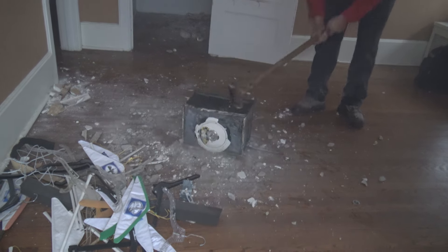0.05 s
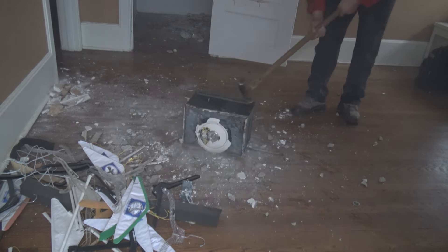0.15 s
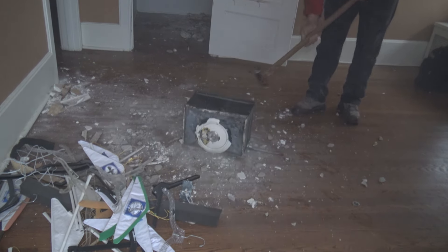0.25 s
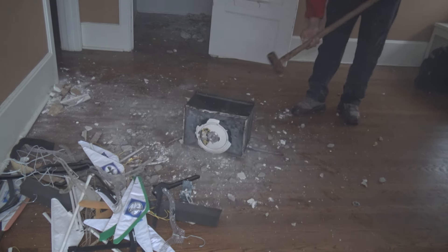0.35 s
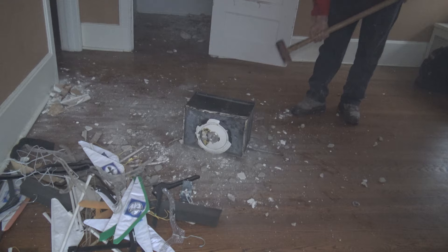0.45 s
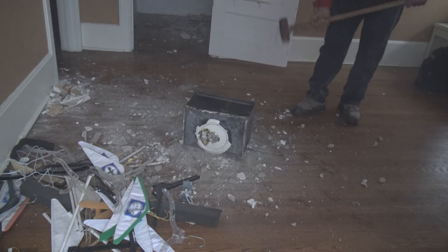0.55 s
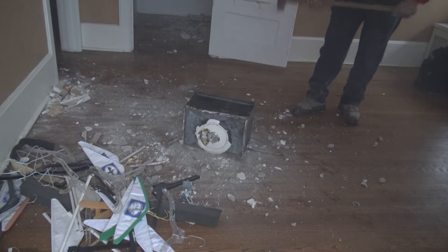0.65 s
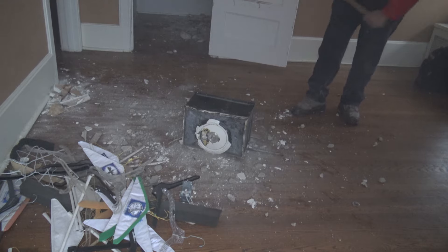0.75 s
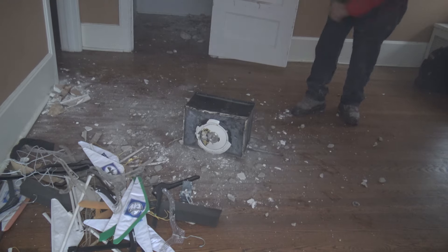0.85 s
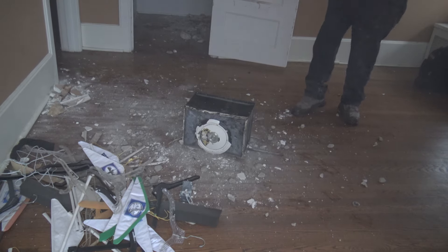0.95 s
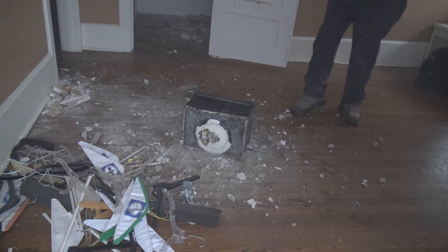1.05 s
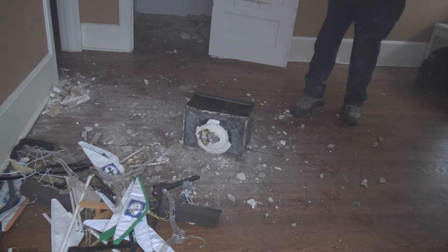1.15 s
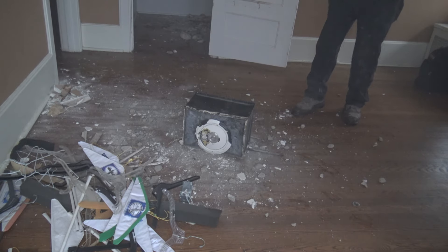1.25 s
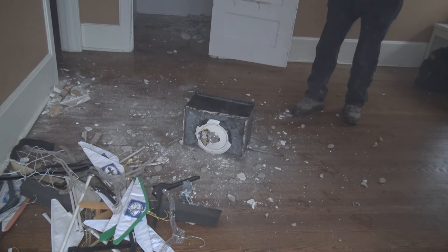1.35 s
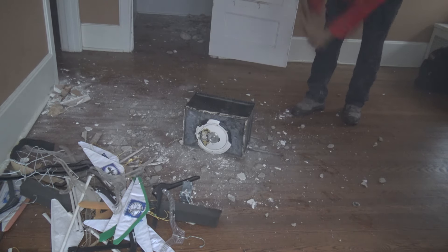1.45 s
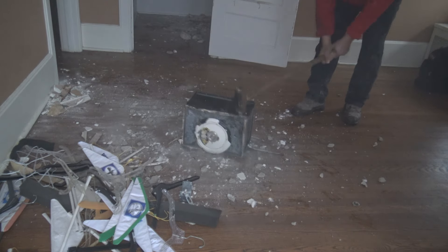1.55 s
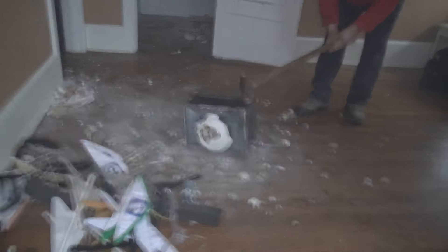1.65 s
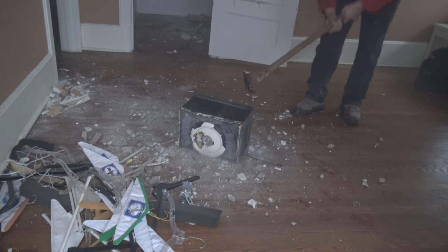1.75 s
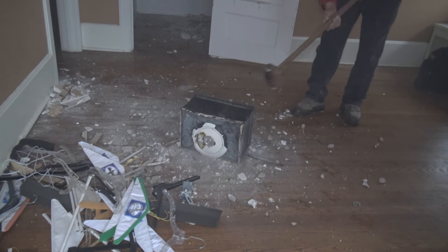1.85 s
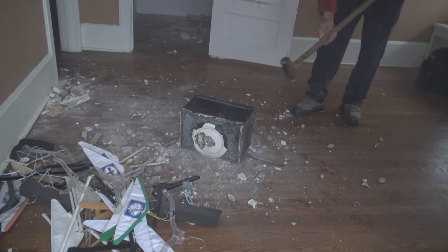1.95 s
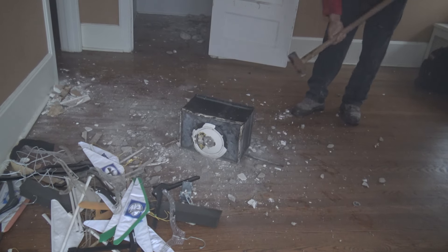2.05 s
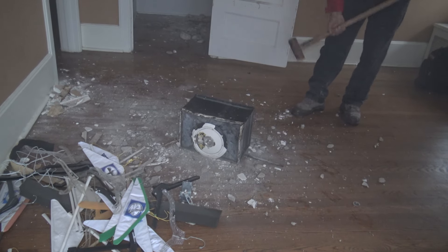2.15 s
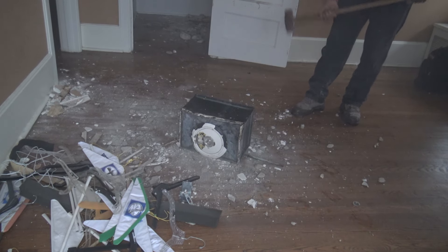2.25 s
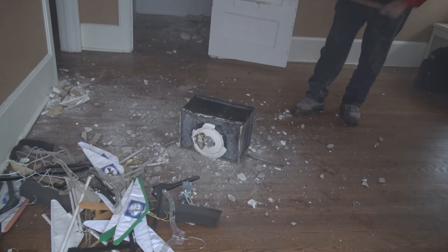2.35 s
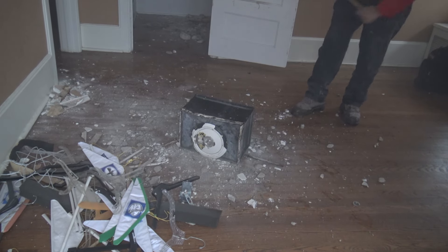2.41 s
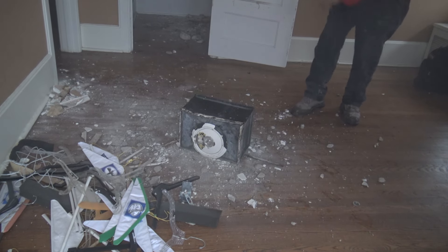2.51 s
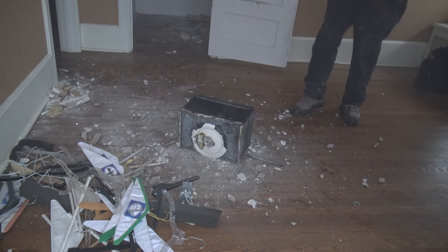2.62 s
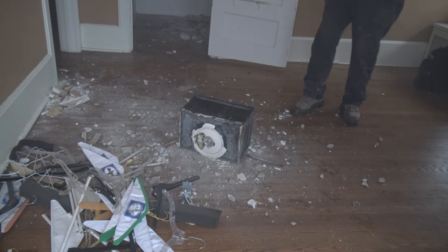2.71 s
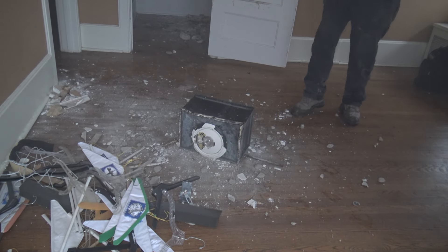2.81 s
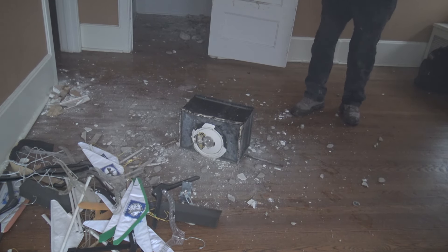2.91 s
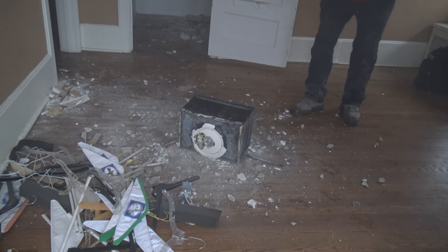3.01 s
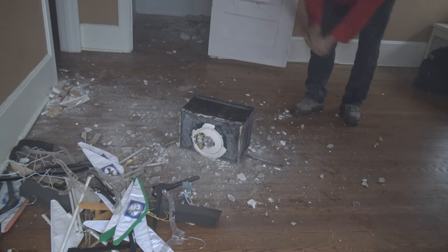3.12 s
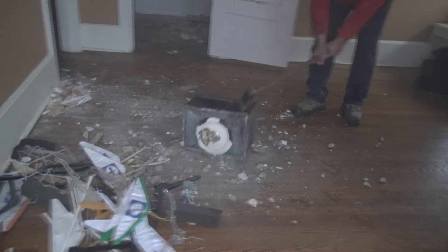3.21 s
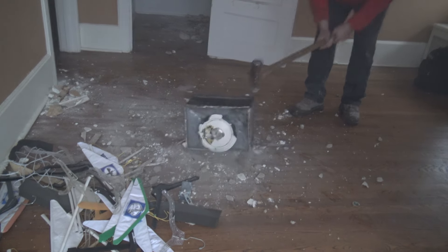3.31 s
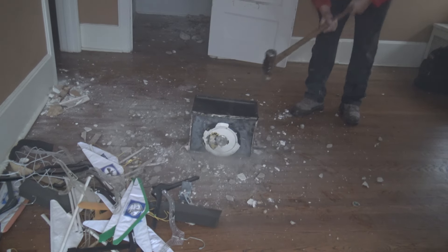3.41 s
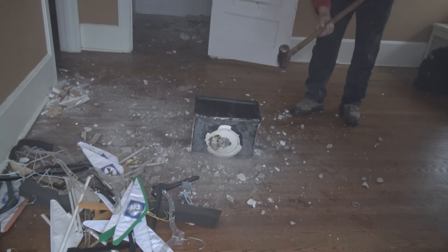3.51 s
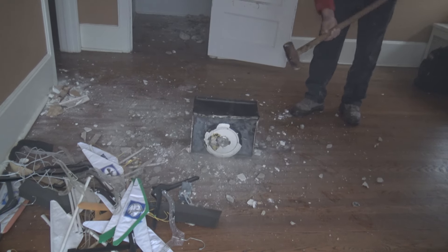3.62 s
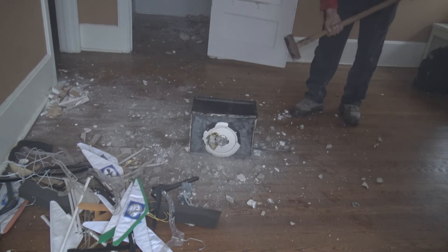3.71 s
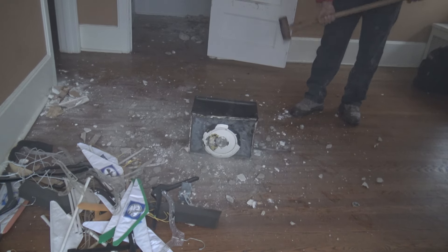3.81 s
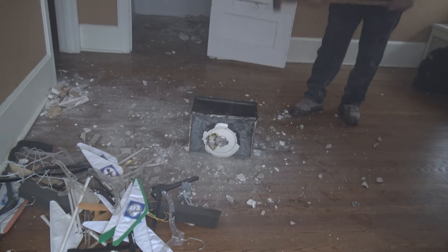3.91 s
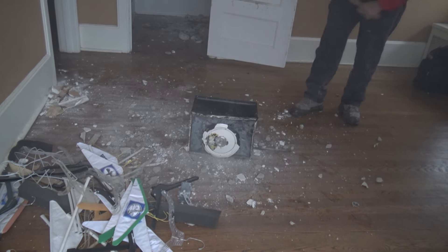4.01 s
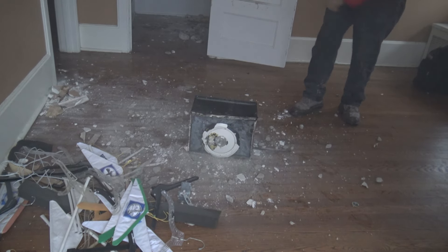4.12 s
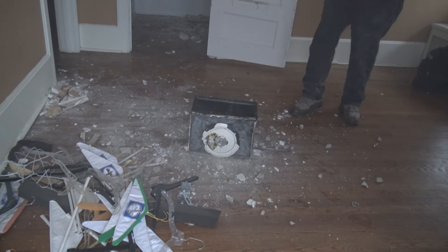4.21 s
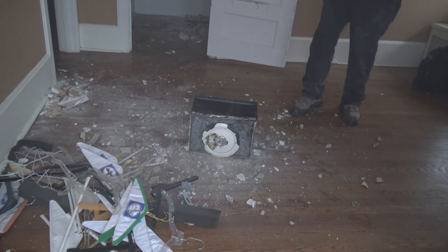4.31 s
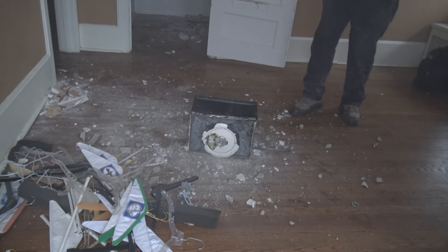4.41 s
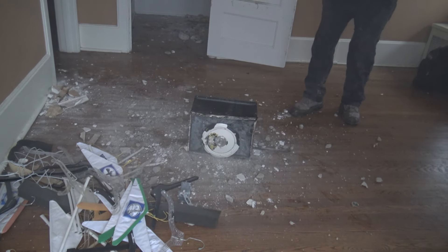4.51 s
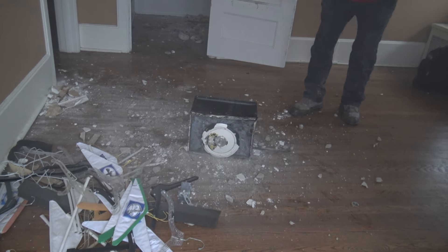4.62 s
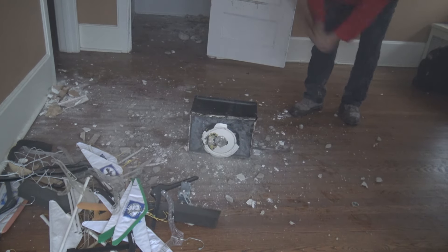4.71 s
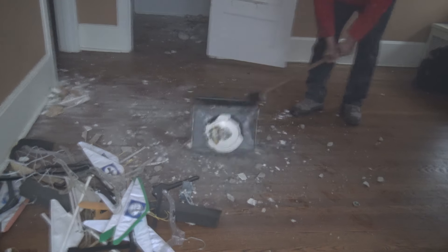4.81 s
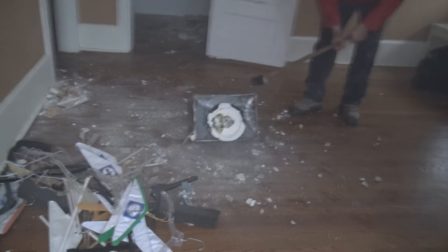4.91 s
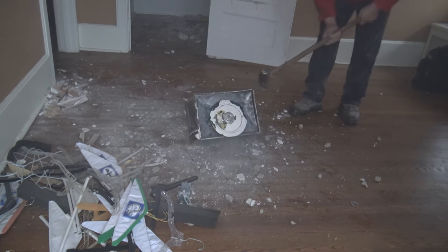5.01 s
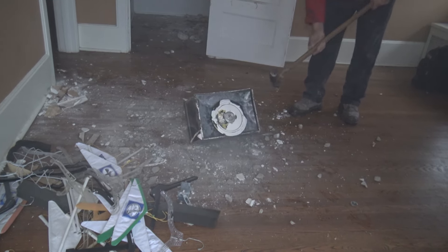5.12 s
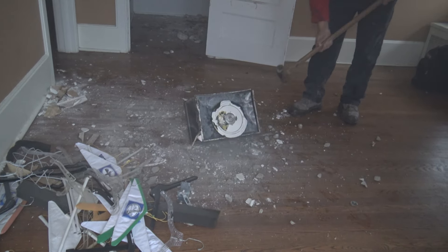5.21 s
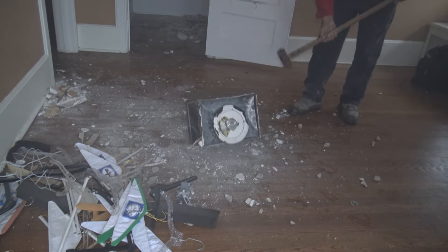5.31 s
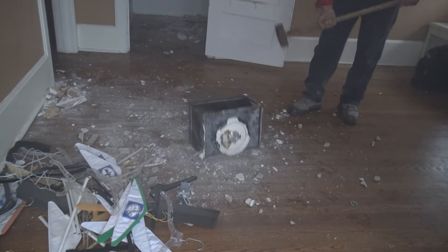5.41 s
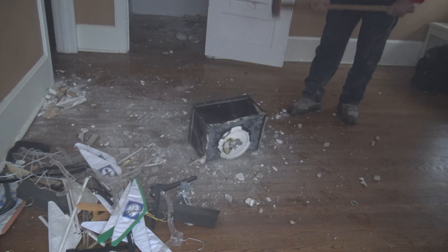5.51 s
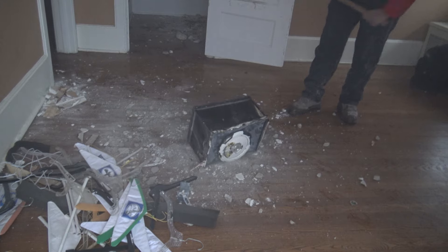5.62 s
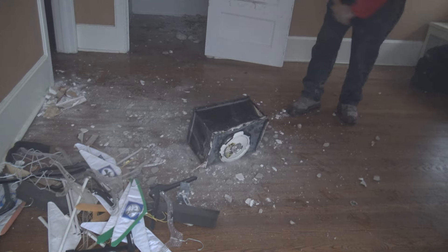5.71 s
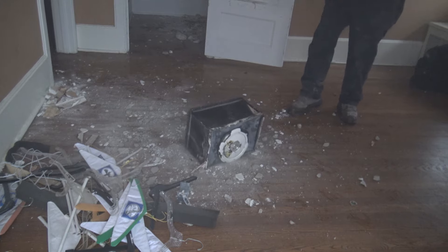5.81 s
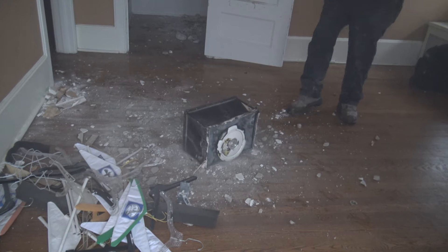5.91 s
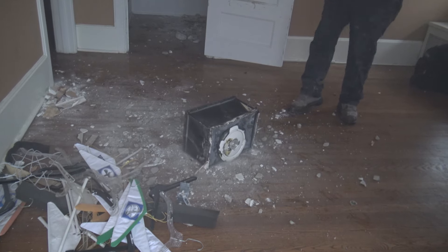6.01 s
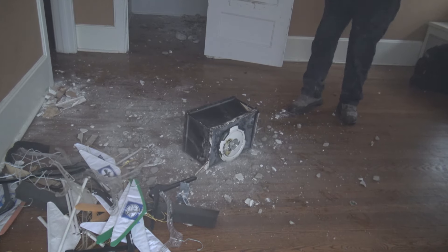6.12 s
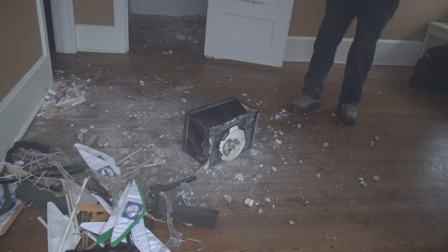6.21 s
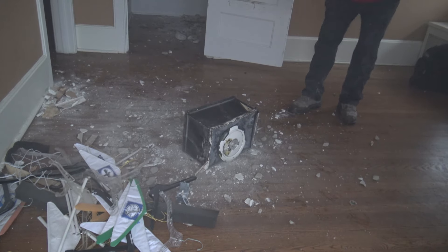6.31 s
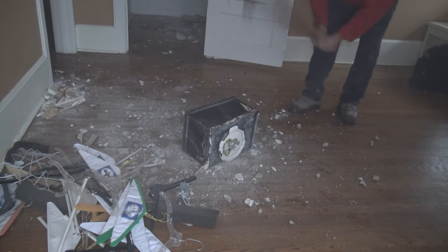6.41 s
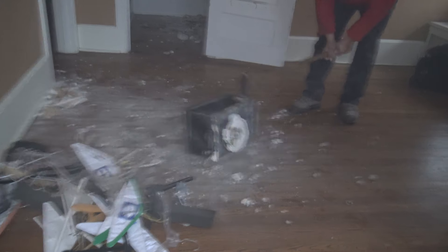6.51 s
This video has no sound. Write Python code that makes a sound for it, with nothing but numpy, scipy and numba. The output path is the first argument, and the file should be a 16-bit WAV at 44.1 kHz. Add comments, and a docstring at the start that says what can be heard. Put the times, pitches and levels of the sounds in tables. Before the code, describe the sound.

Heavy hammer blows crash on a hollow steel box every second and a half, each followed by a thudding landing, grit and echoing room tail.

```python
"""A sledgehammer strikes a small steel safe on the bare boards of an empty house; the safe jumps, rocks and lands.
Each knock is a rattling crash, damped modes of steel and floor, and a crack; grit grinds under the tipping safe.
Close by, plaster chips click, a boot crunches grit, heels push the boards and a sleeve swishes before later swings.
Shaped noise makes the hush and a room tail of about a second.
The camera's fast limiter flattens every blow into a long plateau."""
import sys
import numpy as np
from scipy import signal
from scipy.fft import rfft, irfft, next_fast_len
from scipy.io import wavfile
from scipy.ndimage import uniform_filter1d, minimum_filter1d
from numba import njit

SR = 44100
rng = np.random.default_rng(int(sys.argv[2]) if len(sys.argv) > 2 else 0)


def output_pcm(signal):
    """Save a mono or channel-first signal as 16-bit PCM at the path in sys.argv[1].

    Samples are clipped to [-1, 1] before scaling.
    """
    pcm = np.clip(np.atleast_2d(signal).T, -1, 1) * 32767
    wavfile.write(sys.argv[1], SR, np.round(pcm).astype(np.int16))


N = 288855
LEAD = 8820  # samples that run before time zero

# All levels are relative, ahead of the limiter.
# Hammer blows on the safe. Each row: start in seconds, strength dB, bass dB, treble dB, lowest panel Hz,
# panel ring dB, lean dB from the upper to the lower panels.
BLOW_KNOCKS = [(-.07, 11.5, 4.5, 2.5, 262.7, 6.5, 4.5), (1.553, 4.5, 4, 6, 272.4, 5, -2.5),
               (3.202, 8, 4.5, 6, 257, 5.5, -2.5), (4.805, 11, 3, 9, 257.8, 2.5, -4.5),
               (6.492, 18, -1, 6.5, 263.6, -1.5, -2)]
# The safe landing and rocking on the boards. Each row: the columns of the blows, in the same units.
LANDING_KNOCKS = [(.09, 2, 2.5, 6, 265.7, 4.5, 7), (1.774, -4, 1.5, 1, 274.5, 2.5, -13),
                  (1.827, -5.5, 1.2, -1, 255, 4, -0.5), (3.43, 2, 2, 2.5, 263.4, 5, -6),
                  (3.692, -10.5, -0.5, -1.5, 266.6, 7, -5.5), (3.814, -24, 4, 7.5, 273, 10, 7),
                  (3.905, -22.5, 4, -6, 273, 3.5, -16), (4.015, -28.5, 4, -1, 270.4, -12, -3),
                  (4.09, -33, -4, -17, 279, 0, -13), (4.237, -30.5, 0.5, -10, 265, -4, 2),
                  (4.367, -31.5, -11, -20, 272, -12, 0), (4.419, -33.5, 0.5, -21, 282, -0.5, 11),
                  (4.953, -10, 4.5, -3, 258.6, 4, -11), (5.098, -11, -8, 2, 265.5, 9.5, 0),
                  (5.419, -16.5, 1.5, 1.5, 272, -8, -6), (5.466, -1.5, 4, 4, 279, 6, 6),
                  (5.56, -3, -1.5, -0.7, 296, -9, -7), (5.842, -2.5, 2.5, -1.5, 271.6, 5.5, -6.5),
                  (5.918, -17.5, 4.5, 10.5, 289, -1, -19)]
# Steel on steel, then steel on wood. Each: crack level in dB, floor thud level in dB.
STEEL_CONTACT = (-33.5, -2.2)
WOOD_CONTACT = (-41.5, -4.5)

# Overall spectrum of the crash. Each row: frequency in Hz, relative density in dB per Hz.
CRASH_SLOPE = [(30, -15), (62, -5.5), (100, -14.5), (170, -3), (300, -2.5), (500, -1.5), (680, -2),
               (950, -5.5), (1350, -4), (2200, -6), (3500, -13), (6000, -20), (10000, -27.5),
               (16000, -43.5)]
# Broad resonances of the steel box. Each row: frequency in Hz, width in octaves, nominal height in dB.
BOX_RESONANCES = [(270, 0.043, 3.5), (457, 0.13, 2), (658, 0.029, 3.5), (780, 0.049, 0), (1268, 0.049, 3),
                  (1680, 0.055, 1.5), (2240, 0.15, 0.5)]
# Safe panels above the lowest. Each row: frequency in Hz, t60 in seconds, level in dB, share of the lean.
UPPER_PANELS = [(392.8, 1.3, -4.5, 1.12), (491.3, 0.88, -2, -0.8), (652.5, 0.95, -9, -1.03)]
# Smaller modes of safe and floor, stirred by each knock. Each row: nominal Hz, nominal dB, t60 in seconds.
BODY_MODES = [(90.5, -18, 0.33), (139, -3, 0.89), (171.4, -0.5, 0.9), (213, -3, 0.74), (324, -28, 0.2),
              (433, 7.5, 0.21), (501, -6, 0.47), (584.6, 1, 0.61), (800, -4, 0.78), (1272, -2.5, 0.57),
              (1378, 6.5, 0.11), (1654, -3, 0.39)]
# Floor thud: frequency in Hz, t60 in seconds.
FLOOR_THUD = (62, 0.76)

# Decay of the empty room. Each row: frequency in Hz, t60 in seconds.
ROOM_DECAY = [(40, 1.1), (125, 0.59), (300, 1.047), (800, 0.87), (2000, 0.95), (5000, 0.87), (10000, 0.5),
              (16000, 0.14)]
# Stereo width of room and hush. Each row: frequency in Hz, side minus mid in dB.
ROOM_WIDTH = [(40, -27), (250, -22), (2000, -41), (5000, -15.5), (9000, -9), (14000, -22)]
# Balance of the microphone pair. Each row: frequency in Hz, left minus right in dB.
MIC_BALANCE = [(60, 1), (250, -1.9), (1000, -3), (4000, -1.6), (9000, 0)]
# Quiet house tone. Each row: frequency in Hz, relative density in dB per Hz.
HOUSE_TONE = [(18, -33), (30, -8), (202, -5.5), (277, -2.5), (324, -6), (1200, -13), (1510, -10),
              (1640, -10.5), (6210, -21), (15500, -34.5)]

# Heel on the boards. Each row: start in seconds, level in dB, lower mode in Hz.
HEEL_STEPS = [(0.83, -32, 176.7), (1.371, -19, 134), (4.395, -33.5, 166), (4.459, -32.5, 168)]
# Plaster chips bouncing on the boards. Each row: start in seconds, level in dB, pitch in Hz.
CHIP_BOUNCES = [(1.066, -24, 5340), (1.116, -13.5, 5450), (2.2243, -25.5, 7640), (2.2613, -36, 5700),
                (2.4775, -28, 5640), (2.6121, -44, 5400), (2.621, -29, 8670), (2.6434, -47, 9050),
                (4.174, -27.5, 7060)]
# Sleeve and hand sliding along the handle. Each row: middle in seconds, level in dB.
SLEEVE_SWISHES = [(1.311, -37), (2.971, -39), (4.581, -38.5), (6.263, -42.5)]
# The safe grinding over grit as it tips. Each row: time in seconds, level in dB, centre in Hz.
GRIND_PATH = [(5.47, -10, 606), (5.52, -16.5, 720), (5.6, -16.5, 1530), (5.699, -24, 2030),
              (5.835, -32, 1594), (5.97, -22.5, 1460), (6.049, -32.5, 1440), (6.181, -39, 1504)]

CRASH_DB, RING_DB, SPLINTER_DB = 42, -17.5, 17.5  # crash, modes, and crack with shower, over a knock's strength
RATTLE_S, RATTLE_SHARE = .028, .25  # at strength 0 dB; the rattle grows with this share of the strength
GENTLE_CLANG = 0.037  # the resonances stand out more by this share for each dB of strength below 0
LOW_PANEL_T60_S, LOW_LEAN = 1.39, .3  # the lowest panel's decay and its share of the lean
CARRY = 0.48  # share of the ringing that outlives the next knock
FLOOR_LEAD_S, FLOOR_BORNE_DB = .0105, -35.5
SHOWER_DB, SHOWER_S = -42, 0.095  # level, decay time constant
EARLY_DB, EARLY_S = -2.5, 0.01  # extra early reflections over the tail, and their decay time constant
DIRECT_DB, CHIP_WET_DB = -13.5, 6.5  # crash sent direct, chips sent to the room
HUSH_DB = -46
HEEL_T60_S, HEEL_UPPER_DB = 0.15, -1.5
GRIT_S, GRIT_DB, GRIT_RISE_S, GRIT_T60_S = 1.104, -25, 0.039, 0.92
SWISH_HALF_S, SWISH_HZ = 0.048, 8300
CEILING_DB, RATIO, ATTACK_S, RELEASE_S = -5, 33, 0.000067, 0.021
TOP_HZ = 15750


def undb(db):
    """Decibels to gain."""
    return 10 ** (np.asarray(db) / 20)


def unit(x):
    """Scale to rms 1."""
    return x / np.sqrt(np.mean(x ** 2))


def along(table, hz):
    """Read a (Hz, value) table on a log-frequency axis."""
    f, v = np.transpose(table)
    return np.interp(np.log(np.maximum(hz, 1)), np.log(f), v)


def colour(x, db_of):
    """Filter by a gain in dB given as a function of frequency."""
    n = x.shape[-1]
    hz = np.arange(n // 2 + 1) * SR / n
    return irfft(rfft(x) * undb(db_of(hz)), n)


def band(x, hz, octaves):
    """Bell-shaped band on a log-frequency axis, 6 dB down at the given octaves from its centre."""
    return colour(x, lambda f: -6 * (np.log2(np.maximum(f, 1) / hz) / octaves) ** 2)


def add(track, s, sound):
    """Mix a sound into a track at time s."""
    i = int(s * SR) + LEAD
    track[i:i + len(sound)] += sound[:len(track) - i]


def ring(hz, t60, t):
    """One damped mode."""
    return np.sin(2 * np.pi * hz * t) * 1000 ** (-t / t60)


def crushed_grains(n):
    """Noise with a random strength for each sample, for dense crushed grains."""
    return rng.standard_normal(n) * undb(3 * np.minimum(rng.exponential(size=n), 5))


def clang(hz, depth=1):
    """Gain in dB of the steel box: its overall slope and its resonances."""
    peaks = sum(db * np.exp(-(np.log2(np.maximum(hz, 1) / f) / w) ** 2) for f, w, db in BOX_RESONANCES)
    return along(CRASH_SLOPE, hz) + depth * peaks


def rattling(shape_db, rattle):
    """A click that bounces about inside the box: a chain of allpass echoes spreads it without colouring it."""
    hz = np.arange(4097) * SR / 8192
    spread = 1
    for lag in rng.uniform(.01, .15, 8) * np.clip(rattle, .004, .04):
        echo = np.exp(-2j * np.pi * hz * lag)
        spread = spread * (echo - .6) / (1 - .6 * echo)
    cepstrum = irfft(np.log(undb(shape_db(hz))))
    cepstrum[1:4096] *= 2  # folding gives the causal response of this colour
    return irfft(spread * np.exp(rfft(cepstrum[:4097], 8192)))


def crash_of(db, bass_db, treble_db):
    """The rattling crash: weaker knocks show the box resonances more and rattle for less time."""
    tilt = [(500, bass_db), (1000, 0), (2500, 0), (7000, treble_db)]
    depth = 1 + GENTLE_CLANG * max(-db, 0)
    rattle = RATTLE_S * undb(RATTLE_SHARE * db)
    return rattling(lambda f: clang(f, depth) + along(tilt, f), rattle)


def modes_of(bass_db, low_hz, ring_db, lean_db, thud_db, gap):
    """Damped modes of body, panels and floor, pushed softly and partly choked by the next knock."""
    t = np.arange(3 * SR // 2) / SR
    body = 0
    for hz, db, t60 in BODY_MODES:
        level_stir, pitch_stir = rng.standard_normal(2)
        body = body + undb(db + bass_db + 1.97 * level_stir) * ring(hz * (1 + 0.00964 * pitch_stir), t60, t)
    panels = undb(LOW_LEAN * lean_db) * ring(low_hz, LOW_PANEL_T60_S, t)
    for hz, t60, db, share in UPPER_PANELS:
        panels = panels + undb(db + share * lean_db) * ring(hz, t60, t)
    thud = undb(thud_db + bass_db) * ring(*FLOOR_THUD, t)
    damped = np.interp(t, [gap - .01, gap + 0.009], [1, CARRY])
    return (1 - np.exp(-t / 0.0022)) * damped * (body + undb(ring_db) * panels + thud)


def splinter(crack_db):
    """A bright crack and a shower of chips: a short noise burst and longer, grainy noise."""
    t = np.arange(SR // 2) / SR
    crack = unit(band(rng.standard_normal(len(t)), 4500, 1.3)) * np.exp(-t / .007)
    grains = rng.standard_normal(len(t)) * undb(2.8 * rng.exponential(size=len(t)))
    shower = unit(band(grains, 6440, 0.55)) * np.exp(-t / SHOWER_S)
    return undb(crack_db) * crack + undb(SHOWER_DB) * shower


def floor_shiver():
    """An early shiver through the boards: wood carries sound faster than air."""
    shiver = unit(band(rng.standard_normal(SR // 2), 1040, 1.03))[:int(FLOOR_LEAD_S * SR)]
    return np.hanning(len(shiver)) ** 1.5 * shiver


def safe(n):
    """Every blow and landing: the crash on one track; modes, splinter and early shiver on the near track."""
    crash, near = np.zeros(n), np.zeros(n)
    blows = [(*k, *STEEL_CONTACT) for k in BLOW_KNOCKS]
    landings = [(*k, *WOOD_CONTACT) for k in LANDING_KNOCKS]
    knocks = sorted(blows + landings)
    gaps = np.diff([k[0] for k in knocks], append=99)
    for knock, gap in zip(knocks, gaps):
        s, db, bass_db, treble_db, low_hz, ring_db, lean_db, crack_db, thud_db = knock
        add(crash, s, undb(db + CRASH_DB) * crash_of(db, bass_db, treble_db))
        add(near, s, undb(db + RING_DB) * modes_of(bass_db, low_hz, ring_db, lean_db, thud_db, gap))
        add(near, s, undb(db + SPLINTER_DB + treble_db) * splinter(crack_db))
        add(near, s - FLOOR_LEAD_S, undb(db + FLOOR_BORNE_DB) * floor_shiver())
    return crash, near


def room(x):
    """Diffuse tail in mid and side, unit energy in mid; every half octave dies at its own rate."""
    t = np.arange(2 * 32768) / SR
    tail = 0
    for hz in 30 * 2 ** np.arange(0, 9.5, .5):
        t60 = along(ROOM_DECAY, hz)
        noise = band(rng.standard_normal((2, len(t))), hz, 0.4)
        tail = tail + noise * 1000 ** (-t / t60) / np.sqrt(t60)
    tail = tail * (1 - np.exp(-t / 0.0022)) * (1 + undb(EARLY_DB) * np.exp(-t / EARLY_S))
    tail = tail / np.sqrt(np.sum(tail[0] ** 2))
    tail[1] = colour(tail[1], lambda f: along(ROOM_WIDTH, f))
    return signal.fftconvolve(x[None], tail, axes=1)[:, :len(x)]


def house_hush(n):
    """Steady noise with the colour of the quiet house, two independent channels."""
    hush = colour(rng.standard_normal((2, n)), lambda f: along(HOUSE_TONE, f))
    return undb(HUSH_DB) * hush / hush[0].std()


def heels(n):
    """A soft push that rings the boards at two modes."""
    out, t = np.zeros(n), np.arange(SR // 2) / SR
    push = 1 - np.exp(-t / 0.0063)
    for s, db, hz in HEEL_STEPS:
        upper = undb(HEEL_UPPER_DB) * ring(2.02 * hz, HEEL_T60_S / 2, t)
        add(out, s, undb(db) * push * (ring(hz, HEEL_T60_S, t) + upper))
    return out


def chips(n):
    """A click that rings for a few milliseconds."""
    out, t = np.zeros(n), np.arange(600) / SR
    for s, db, hz in CHIP_BOUNCES:
        click = 0.14 * ring(hz, 0.0024, t)
        click[8] += 1
        add(out, s, undb(db + 7.0) * band(click, hz, 0.59))
    return out


def grit(n):
    """A boot crunches grit: dense grains around 1.7 kHz with the box resonances swell quickly and die away."""
    t = np.maximum((np.arange(n) - LEAD) / SR - GRIT_S, 0)
    shape = (1 - np.exp(-t / GRIT_RISE_S)) * 1000 ** (-t / GRIT_T60_S)
    grains = band(crushed_grains(n), 1700, 1.5)
    crunch = colour(grains, lambda f: clang(f) - along(CRASH_SLOPE, f))  # resonances without the slope
    return unit(crunch) * undb(GRIT_DB) * shape


def swish(n):
    """Bright cloth hiss that swells and fades."""
    out, t, hz = np.zeros(n), np.linspace(-.3, .3, 26460), SWISH_HZ
    cloth = [(hz / 6, -16), (hz / 2, -6), (hz, 0), (2 * hz, -16)]
    for s, db in SLEEVE_SWISHES:
        hiss = unit(colour(rng.standard_normal(len(t)), lambda f: along(cloth, f)))
        add(out, s - .3, undb(db) * hiss * np.exp(-(t / SWISH_HALF_S) ** 2 / 2))
    return out


def grind(n):
    """Stick-slip grains through a resonance that follows the tipping of the safe."""
    s, db, hz = np.transpose(GRIND_PATH)
    t = (np.arange(n) - LEAD) / SR
    grains = crushed_grains(n)
    path_hz = np.interp(t, s, hz)
    moving = 0
    for centre in 500 * 2 ** np.arange(0, 3, .5):
        nearness = np.exp(-2 * np.log2(path_hz / centre) ** 2)
        moving = moving + unit(band(grains, centre, 0.27)) * nearness
    return moving * undb(np.interp(t, s, db, -120, -120))


def scene():
    """All sources, direct and through the room, over the hush of the house, on a stereo pair."""
    n = next_fast_len(N + LEAD)
    crash, near = safe(n)
    hush = house_hush(n)
    feet, small, crunch, cloth, drag = heels(n), chips(n), grit(n), swish(n), grind(n)
    to_room = crash + undb(-3.5) * feet + undb(CHIP_WET_DB) * small
    to_room = to_room + undb(-8) * crunch + undb(-3.0) * cloth + undb(-10.5) * drag
    mid, side = room(to_room)
    mid = mid + undb(DIRECT_DB) * crash + near + feet + small + crunch + cloth + drag + hush[0]
    # near treble, delayed 9 samples in the side channel, widens the close cracks
    late_treble = band(np.roll(near, 9), 10000, 1.0)
    side = side + colour(hush[1] + late_treble, lambda f: along(ROOM_WIDTH, f))
    left = colour(mid + side, lambda f: along(MIC_BALANCE, f) / 2)
    right = colour(mid - side, lambda f: -along(MIC_BALANCE, f) / 2)
    return np.array([left, right])[:, LEAD:LEAD + N]


@njit
def follow(x, rise, fall):
    """Envelope follower: quick rise, slower fall."""
    e, out = 0., np.empty(len(x))
    for i in range(len(x)):
        e += (x[i] - e) * (rise if x[i] > e else fall)
        out[i] = e
    return out


def record(dry):
    """A limiter common to both channels, a soft clip for what slips past it, then the top is cut."""
    loud = follow(np.abs(dry).max(axis=0), 1 / (ATTACK_S * SR), 1 / (RELEASE_S * SR))
    gain = np.minimum(1, (undb(CEILING_DB) / (loud + 1e-9)) ** (1 - 1 / RATIO))
    gain = uniform_filter1d(minimum_filter1d(gain, size=41), size=41)  # brief look-ahead, smoothed
    held = np.tanh(dry * gain)
    top_cut = signal.ellip(10, .2, 70, TOP_HZ, fs=SR, output="sos")
    return signal.sosfilt(top_cut, held)


dry = scene()
out = record(dry)
output_pcm(out)
```